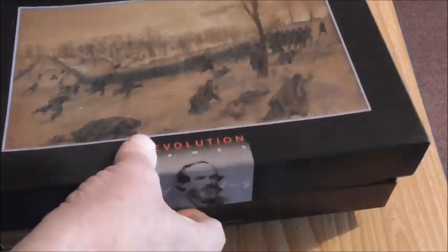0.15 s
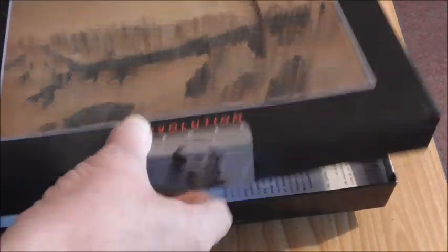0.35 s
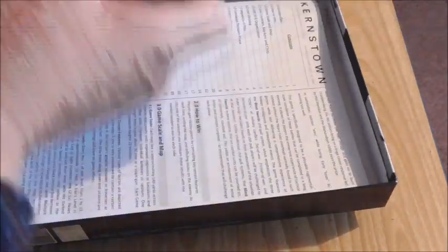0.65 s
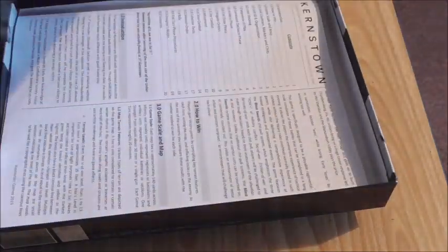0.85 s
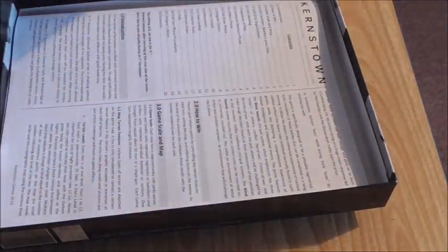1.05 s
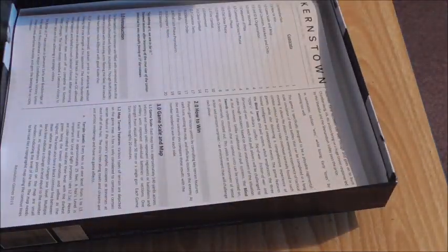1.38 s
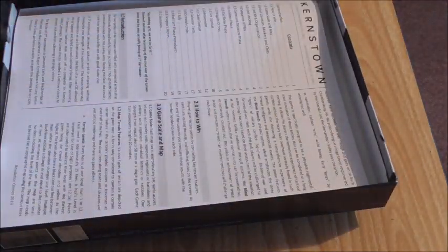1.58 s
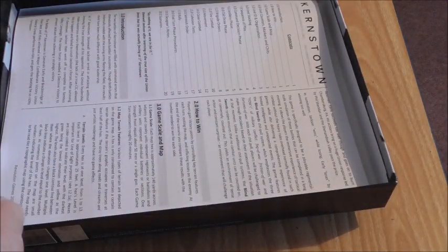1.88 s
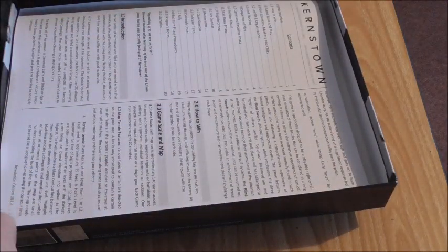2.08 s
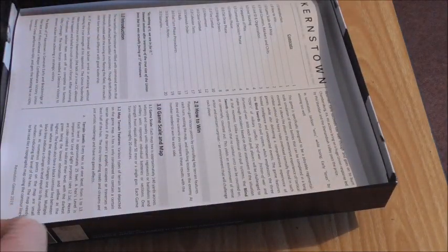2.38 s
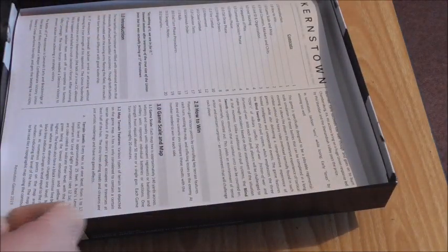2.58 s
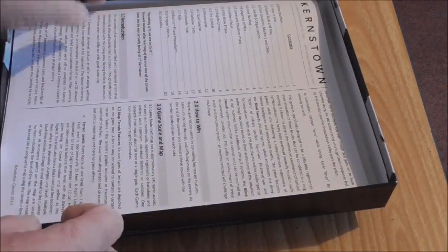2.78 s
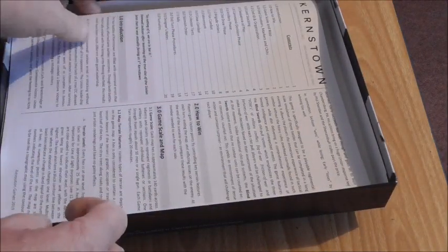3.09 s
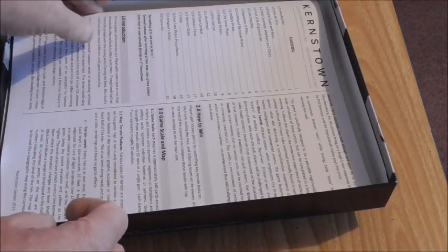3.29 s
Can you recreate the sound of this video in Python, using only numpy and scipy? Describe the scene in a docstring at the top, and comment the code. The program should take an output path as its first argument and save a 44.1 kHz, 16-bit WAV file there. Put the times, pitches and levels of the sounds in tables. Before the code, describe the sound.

A cardboard box lid works loose and slides off, with hollow knocks and paper rubbing.

```python
"""A small, quiet room; a cardboard game box on a wooden table, the microphone close by.
The tight lid creeps, groans and works loose in a few pops, slides off and is set aside; hands knock the
box and brush the booklet. Each knock has a dead ring at the contact, the ring of the panels, a hollow
boom and a dry crack. Card edges tick and a finger drags on the box wall, over room tone, hiss and drone."""
import sys
import numpy as np
from scipy import signal
from scipy.fft import rfft, irfft, next_fast_len
from scipy.io import wavfile
from scipy.ndimage import map_coordinates

SR = 44100
rng = np.random.default_rng(int(sys.argv[2]) if len(sys.argv) > 2 else 0)


def bounce(signal):
    """Save signal as a 16-bit WAV file at the path given by the first command-line argument."""
    frames = np.transpose(np.atleast_2d(signal))
    limited = np.clip(frames, -1, 1)
    pcm = np.round(limited * 32767).astype(np.int16)
    wavfile.write(sys.argv[1], SR, pcm)


N = 152145


def amp(db):
    return 10 ** (np.asarray(db) / 20)


def unit(x):
    return x / np.sqrt(np.mean(x ** 2) + 1e-20)


def along(points, hz):
    """Read (f/Hz, value) points on a log frequency axis."""
    f, values = np.transpose(points)
    return np.interp(np.log(hz + 1), np.log(f + 1), values)


def curves(rows):
    """One value per sample for each column after the time."""
    times, *columns = np.transpose(rows)
    return [np.interp(np.arange(N) / SR, times, column) for column in columns]


def filtered(x, response):
    """x times a response of frequency."""
    n = x.shape[-1]
    padded = next_fast_len(n + SR // 10)
    return irfft(rfft(x, padded) * response(np.fft.rfftfreq(padded, 1 / SR)), padded)[..., :n]


def band(x, centre, width):
    """x through one resonance, at rms 1; width is the half width as a share of the centre."""
    return unit(filtered(x, lambda hz: 1 / (1 + ((hz / centre - 1) / width) ** 2)))


def noise(size):
    """Two unrelated white noises."""
    return rng.standard_normal((2, size))


def fade(t, t60):
    """A decay of 60 dB in t60 seconds."""
    return np.exp(-np.log(1000) * t / t60)


def ring(t, hz, t60, rise):
    """One damped mode; t60 and rise in seconds."""
    return np.sin(2 * np.pi * hz * t) * fade(t, t60) * (1 - np.exp(-t / rise))


def add(out, start, x):
    """Mix x into out at start seconds."""
    i = max(0, round(start * SR))
    out[:, i:i + x.shape[-1]] += x[..., :max(0, N - i)]


# how alike left and right are at the microphone (f/Hz, correlation)
LIKENESS = [(30, 0.19), (120, 0.85), (300, 0.88), (600, 0.51), (1300, 0.7), (2500, 0.71), (5000, 0.43),
            (12000, .02)]


def stereo(pair, colour=None, width=1):
    """Two unrelated signals to a coloured left and right of rms 1; width 1 is the room's spread."""
    angle = lambda hz: width * np.arccos(np.clip(along(LIKENESS, hz), -1, 1)) / 2
    gain = lambda hz: 1 if colour is None else amp(along(colour, hz))
    mid, side = filtered(pair, lambda hz: gain(hz) * np.array([np.cos(angle(hz)), np.sin(angle(hz))]))
    return unit(np.array([mid + side, mid - side]))


# reverberation of the small room (f/Hz, t60/s)
ROOM_DECAY = [(100, 0.95), (260, 0.36), (700, 0.36), (1800, 0.31), (4800, 0.35), (13000, 0.3)]


def in_room(x, wet_db):
    """The close sound, then a diffuse tail in which each frequency dies at its own speed."""
    hz, t, spectrum = signal.stft(stereo(noise(SR // 2)), SR, nperseg=256)
    t60 = along(ROOM_DECAY, hz)[:, None]
    equal_energy = np.sqrt(2 * np.log(1000) / t60 / SR)
    tail = signal.istft(spectrum * fade(t, t60) * equal_energy, SR, nperseg=256)[1]
    tail *= 1 - np.exp(-(np.arange(tail.shape[1]) / SR / 0.0025) ** 2)  # builds up in 2.5 ms
    return x + amp(wet_db) * signal.fftconvolve(x, tail, axes=1)[:, :x.shape[1]]


# spectra of the room tone and of a soft hiss (f/Hz, relative level/dB)
ROOM_TONE_COLOUR = [(25, 5), (50, 14), (90, -6), (140, 11.5), (220, -4), (330, -4.5), (450, -2), (600, -8),
                    (850, -16), (1300, -2), (1800, -21.5), (5500, -30.5), (9000, -20)]
HISS_COLOUR = [(500, 10), (1400, -1), (2100, 1.5), (2800, -4.5), (4000, 2.5), (5500, -5.5), (9000, -1),
               (12000, -4.5), (15000, -12), (16000, -38)]
# swell of the hiss (t/s, level/dB)
HISS_SWELL = [(0, -64), (.2, -69.5), (.54, -59.5), (1.15, -60.5), (1.4, -61.5), (1.82, -60), (2.05, -71),
              (2.3, -65), (2.5, -55), (2.8, -69), (3.45, -72)]
# faint hollow drone in the room (t/s, centre f/Hz, level/dB)
DRONE_DRIFT = [(0, 417.3, -51), (.12, 401, -50), (.45, 390.5, -55), (1.5, 343, -66), (2.35, 335, -53.5),
               (2.9, 371, -90), (3.25, 447.5, -59), (3.45, 479.5, -53.5)]


def background():
    """The air around the microphone: room tone, hiss and a narrow band of noise that drifts."""
    centre_hz, drone_db = curves(DRONE_DRIFT)
    half_width_hz = 42.5
    slow = filtered(noise(N), lambda hz: 1 / (1 + (hz / half_width_hz) ** 2))
    phase = 2 * np.pi * np.cumsum(centre_hz) / SR
    drone = amp(drone_db) * unit(slow[0] * np.cos(phase) + slow[1] * np.sin(phase))
    hiss = amp(curves(HISS_SWELL)[0]) * stereo(noise(N), HISS_COLOUR)
    room_tone = amp(-62.5) * stereo(noise(N), ROOM_TONE_COLOUR)
    return drone + hiss + room_tone


def friction(colour=None, slips_per_s=900, scatter_db=4):
    """Tiny slips of scattered size on a smooth rush."""
    slips = (rng.random((2, N)) < slips_per_s / SR) * np.sign(noise(N))
    slips *= amp(scatter_db * noise(N))
    return stereo(unit(slips) + 0.9 * noise(N), colour)


# the creeping lid: its swell (t/s, level/dB) and spectrum (f/Hz, relative level/dB)
CREEP_SWELL = [(0, -52.5), (.13, -49), (.25, -55), (.5, -59), (.7, -57)]
CREEP_COLOUR = [(100, -3), (220, 1.5), (600, -1), (850, -1.5), (1100, -6), (1450, -7.5), (2000, -18),
                (6000, -28)]


def lid_creep():
    """The lid creeps up the box walls: low friction that stays on faintly to the end."""
    return in_room(amp(curves(CREEP_SWELL)[0]) * friction(CREEP_COLOUR), wet_db=-3)


# card edges, close up, and the room's long ring after a 7.2 kHz tick at 0.204 s (t/s, f/Hz, half width as a
# share of f, level/dB, t60/s)
EDGE_TICKS = [(0.03, 9900, 0.13, -45, 0.025), (0.03, 7040, 0.088, -41, 0.0068),
              (.178, 11400, 0.13, -38.5, 0.0094), (0.204, 7180, 0.037, -46.5, 0.25),
              (0.826, 11600, .13, -43, 0.036), (0.401, 4000, 0.098, -46, 0.037),
              (0.43, 4600, 0.18, -51.5, 0.031), (2.475, 15100, 0.14, -34, 0.028),
              (0.541, 3800, 0.09, -49, 0.044), (2.6961, 3850, 0.05, -30, 0.017),
              (2.6959, 4500, 0.05, -35, 0.014)]
CONTACT_RISE_S = 0.00041


def edge_ticks():
    """The glossy edge of the card catches with thin, pitched ticks."""
    out, t = np.zeros((2, N)), np.arange(SR // 2) / SR
    for start, hz, width, db, t60 in EDGE_TICKS:
        envelope = amp(db) * fade(t, t60) * (1 - np.exp(-t / CONTACT_RISE_S))
        add(out, start, envelope * band(stereo(noise(len(t))), hz, width))
    return in_room(out, wet_db=-9)


def stick_slip(rows):
    """Regular sticking and slipping: a short tone with a weak octave."""
    hz, db = curves(rows)
    t = np.arange(N) / SR
    phase = 2 * np.pi * np.cumsum(hz) / SR
    sliding = (t > rows[0][0]) * (t < rows[-1][0])
    return amp(db) * sliding * (np.sin(phase) + amp(-17) * np.sin(2 * phase))


# course of the lid's groan (t/s, f/Hz, level/dB)
LID_SLIP = [(0.141, 440, -40), (0.151, 446, -23), (0.161, 435, -39), (0.171, 445, -28), (0.177, 453, -18.5),
            (0.185, 445, -31), (0.203, 444, -41)]


def lid_groan():
    """The tight lid sticks and slips as it works loose, straight ahead of the microphone."""
    return in_room(np.tile(stick_slip(LID_SLIP), (2, 1)), wet_db=-9.5)


# modes of the cardboard panels (f/Hz, relative level/dB, t60/s)
PANEL_MODES = [(183, -4, 0.17), (218.6, -5.5, 0.23), (257.4, -10, 0.24), (289, -3.5, 0.34),
               (350, -10.5, 0.34), (445.4, 2, 0.26), (622.4, 0, 0.23), (696, -13, 0.42), (827.2, -1, 0.17),
               (999, -12, 0.27), (1180, -9, 0.29), (1419.5, 0, 0.11)]


def panel_ring(t, contact_hz, loss_db_per_octave=6):
    """A blow favours the panel modes near its contact pitch, never quite the same way twice."""
    out = np.zeros(len(t))
    for k, (hz, db, t60) in enumerate(PANEL_MODES):
        gain = amp(db - loss_db_per_octave * abs(np.log2(hz / contact_hz)) + rng.normal(0, 2))
        detuned_hz = hz * (1 + rng.normal(0, 0.011))
        out += (-1) ** k * gain * ring(t, detuned_hz, t60, CONTACT_RISE_S)
    return out


# spectrum of the crack (f/Hz, relative level/dB)
CRACK_COLOUR = [(200, 6.5), (1350, 9), (2000, -3), (2750, -3), (3900, 4), (5500, -6), (7500, -5),
                (11000, -4.5), (16000, -33)]
BLOW_WIDTH = 0.64  # a close blow spreads less in stereo than the room


def dry_crack(t, cutoff_hz):
    """One sharp push, a burst of noise and a short rattle; a soft contact has a low cut-off."""
    u = (t - 0.00057) / 0.00023  # the push peaks at 0.57 ms, half width 0.23 ms
    push = amp(2.5) * (1 - 2 * u ** 2) * np.exp(-u ** 2)
    burst, rattle = fade(t, t60=0.011), amp(-13) * fade(t, t60=0.044)
    envelope = (burst + rattle) * (1 - np.exp(-t / 0.001))
    crack = push + envelope * stereo(noise(len(t)), CRACK_COLOUR, BLOW_WIDTH)
    return signal.sosfilt(signal.butter(2, cutoff_hz, fs=SR, output="sos"), crack)


# spectrum of the panels' thud (f/Hz, relative level/dB)
THUD_COLOUR = [(30, -35), (70, -47), (130, 3), (400, 19), (520, 13.5), (1300, -3.5), (2000, -18),
               (4000, -31)]
# blows of lid, box and fingers, close to the microphone
# (t/s, contact f/Hz, level/dB of contact, of panels, of boom, of crack, crack cut-off f/Hz)
BLOWS = [(0.151, 1250, -16.5, -38.5, -52, -31.5, 7200), (0.174, 1160, -22, -36.5, -60, -30.5, 5000),
         (0.2071, 926, -10.5, -28, -28, -22, 11300), (.2165, 803, -17.5, -29, -29, -22.5, 4580),
         (.386, 410, -35, -45, -49, -49, 4000), (0.534, 1140, -32, -51, -47.5, -52, 4500),
         (.654, 347, -28, -41, -41, -30.5, 6500), (0.8257, 320, -30, -42, -34, -32.5, 15920),
         (0.852, 226.2, -36.5, -51, -50, -67, 2000), (.914, 1240, -33.5, -50.5, -35.5, -33.5, 16900),
         (1.119, 384, -33, -51, -45.5, -30.5, 3670), (1.148, 888, -39, -46, -42, -39, 5000),
         (1.166, 226, -34.5, -48, -60, -56, 4000),  (1.897, 175, -55, -50, -33.5, -51, 2000),
         (1.9049, 565, -26, -30, -29, -20.5, 3770), (1.961, 359.7, -35, -45.5, -41, -46, 9200),
         (2.18, 613, -56, -41.5, -72, -38.5, 2200), (2.229, 153, -44, -70, -32.5, -65, 990),
         (2.448, 1160, -37, -39.5, -35, -35, 3800), (2.4758, 1070, -6, -25, -22.5, -12, 14800),
         (2.482, 294, -18.5, -29.5, -39, -32, 3000), (2.4998, 206, -18, -33.5, -65, -40, 6000),
         (2.583, 1216, -12.5, -27.5, -37, -22, 6150), (2.6292, 1320, -14.5, -29.5, -30.5, -27, 8000),
         (2.653, 1000, -18, -33, -23, -55, 4000), (2.891, 1290, -41.5, -57.5, -57, -47, 3000),
         (2.984, 596, -39.5, -46.5, -81, -48.5, 2000), (3.155, 695, -31, -43, -50.5, -38.5, 7060),
         (3.2092, 1260, -35.5, -64, -80, -58, 3000)]
CONTACT_CYCLES, SIDE_MODE_RATIO = 13, 1.256


def knocks():
    """Each blow rings its contact spot and the panels, cracks, and sets the hollow box booming."""
    out, t = np.zeros((2, N)), np.arange(SR) / SR
    for start, hz, contact_db, panel_db, boom_db, crack_db, cutoff_hz in BLOWS:
        mode = lambda f: ring(t, f, CONTACT_CYCLES / hz, CONTACT_RISE_S)
        contact = mode(hz) + amp(-9.5) * (mode(hz * SIDE_MODE_RATIO) - mode(hz / SIDE_MODE_RATIO))
        panels = panel_ring(t, hz)
        thud = amp(1.5) * stereo(noise(SR), THUD_COLOUR, BLOW_WIDTH) * fade(t, t60=0.093)
        crack = dry_crack(t, cutoff_hz)
        blow = amp(contact_db) * contact + amp(panel_db) * (panels / 2 + thud) + amp(crack_db) * crack
        # contact spot and panels face the microphone: extra direct sound
        direct = amp(contact_db - 11.5) * contact + amp(panel_db - 10.5) * panels
        boom = amp(boom_db) * ring(t, hz=147.9, t60=0.38, rise=0.0012)
        add(out, start, in_room(blow, wet_db=-4.5) + direct + boom)
    return out


def catching(per_s=110, depth_db=3.5):
    """Sliding card catches and lets go: a quick, uneven gain of rms 1."""
    position = np.arange(N) * per_s / SR
    grip = rng.standard_normal(int(position[-1]) + 2)
    return unit(amp(depth_db * map_coordinates(grip, [position])))


# spectra of a rub's body, hiss and airy top (f/Hz, relative level/dB)
RUB_BODY_COLOUR = [(60, -35), (150, 2.5), (300, -1.5), (440, 7.5), (530, -10), (640, -5), (950, -7),
                   (1120, -1), (1260, 1), (1450, -7.5), (2100, -11), (3000, -38)]
RUB_HISS_COLOUR = [(800, 7), (2000, -3), (2800, -1.5), (3800, 5.5), (4600, 1.5), (6000, -6.5),
                   (8500, -12.5), (11000, -22), (16000, -40.5)]
RUB_AIR_COLOUR = [(4000, -28), (7000, 0.5), (9300, 1), (11300, 1), (13000, -6), (16000, -21)]
# strokes on box and booklet (t/s, rise/s, fall/s, level/dB of body, of hiss, of squeak, of air)
STROKES = [(.27, 0.044, 0.039, -53.5, -77, -63, -82), (.375, 0.044, 0.035, -53.5, -53.5, -72, -62.5),
           (.505, 0.028, 0.033, -46, -51.5, -53, -65), (0.573, 0.041, 0.061, -51.5, -55, -48.5, -61),
           (.88, 0.035, 0.019, -50, -56, -59, -69), (0.946, 0.047, 0.04, -48.5, -55, -49.5, -58),
           (1.06, 0.021, 0.093, -47.5, -52, -71, -58), (1.13, 0.046, 0.12, -49, -51.5, -64, -60),
           (1.29, 0.018, 0.13, -55.5, -63, -67, -74), (1.71, 0.025, 0.065, -56.5, -61.5, -69, -59.5),
           (1.915, 0.028, 0.078, -50, -56, -51, -60.5), (2.174, 0.013, 0.051, -47.5, -56, -50, -65.5),
           (2.39, 0.039, 0.092, -60, -64.5, -65, -65), (2.479, 0.0083, 0.11, -33.5, -42, -62, -63),
           (2.603, 0.039, 0.029, -32, -35.5, -51, -44.5), (2.966, 0.044, 0.068, -41.5, -51.5, -43, -62),
           (3.10, 0.034, 0.049, -60, -60, -60, -66), (3.23, 0.033, 0.044, -56.5, -62.5, -82, -70)]
SQUEAK_HZ = 1225  # the card sings under a steady rub


def rubs():
    """Card slides on card and fingers on paper: each stroke swells and fades."""
    t, gains = np.arange(N) / SR, np.zeros((4, N))
    for start, rise, fall, *levels_db in STROKES:
        stroke = np.clip(np.minimum((t - start) / rise, 1 - (t - start - rise) / fall), 0, 1)
        gains += np.outer(amp(levels_db), stroke)
    body, hiss = friction(RUB_BODY_COLOUR), friction(RUB_HISS_COLOUR)
    squeak = band(friction(), SQUEAK_HZ, width=0.075)
    air = friction(RUB_AIR_COLOUR)
    sliding = sum(gain * layer for gain, layer in zip(gains, (body, hiss, squeak, air)))
    return in_room(catching() * sliding, wet_db=-3)


# course of the finger's groan (t/s, f/Hz, level/dB)
FINGER_SLIP = [(1.6515, 350, -53), (1.653, 345, -32.5), (1.672, 337, -31), (1.677, 250, -50),
               (1.696, 241, -36.5), (1.715, 239, -49), (1.77, 238, -64)]
# modes of the box wall (f/Hz, level/dB, t60/s)
WALL_MODES = [(149, -35.5, 0.27), (185, -40, 0.28), (317, -41, 0.28), (344.3, -43, 0.43), (375, -44.5, 0.5)]


def finger_drag():
    """A finger sticks and slips on the box wall, which rings on after it."""
    since_touch = np.maximum(np.arange(N) / SR - FINGER_SLIP[0][0], 0)
    wall = sum(amp(db) * ring(since_touch, hz, t60, rise=0.01) for hz, db, t60 in WALL_MODES)
    return in_room(np.tile(stick_slip(FINGER_SLIP) + wall, (2, 1)), wet_db=-9.5)


def scene():
    """The box in the foreground, the quiet room behind it."""
    return knocks() + edge_ticks() + rubs() + lid_creep() + lid_groan() + finger_drag() + background()


def record(dry):
    """The camera's microphone thins the bass below 88 Hz and keeps nothing above 16 kHz."""
    low_cut = signal.butter(3, 88, "highpass", fs=SR, output="sos")
    return filtered(signal.sosfilt(low_cut, dry), lambda hz: hz < 16000)


dry = scene()
out = record(dry)
bounce(out)
```